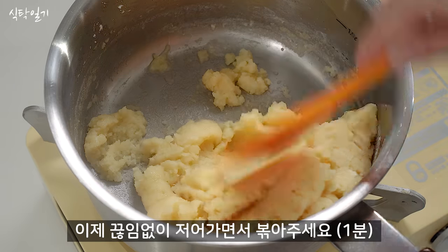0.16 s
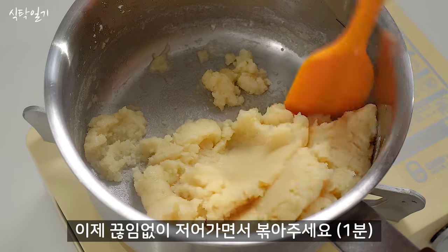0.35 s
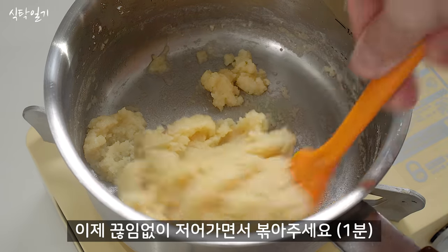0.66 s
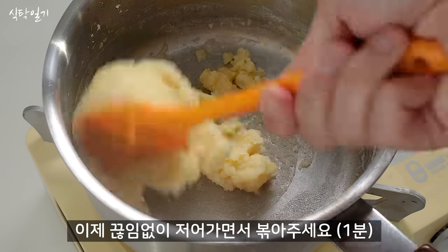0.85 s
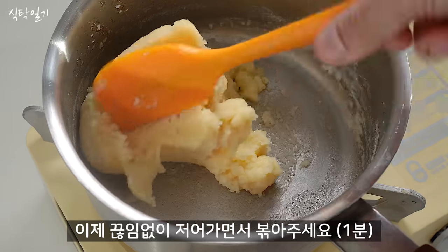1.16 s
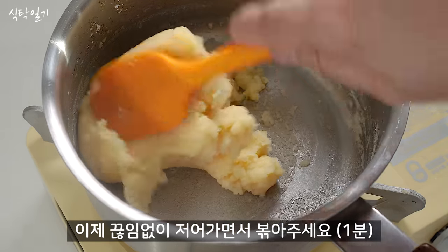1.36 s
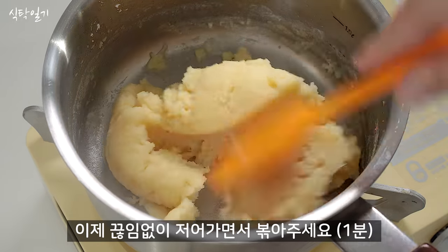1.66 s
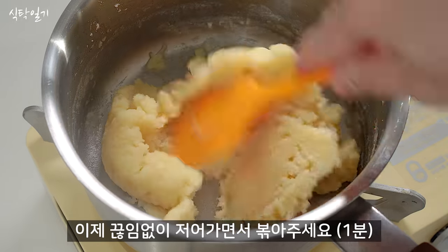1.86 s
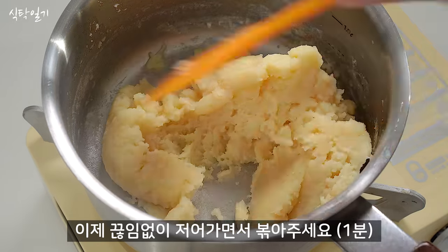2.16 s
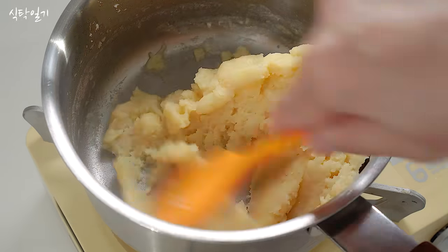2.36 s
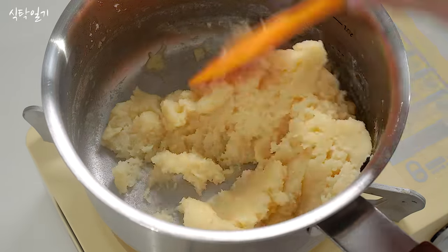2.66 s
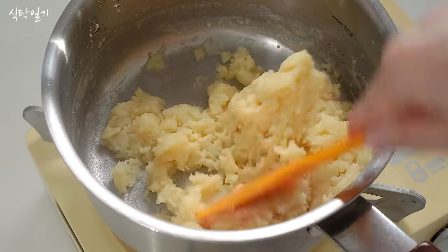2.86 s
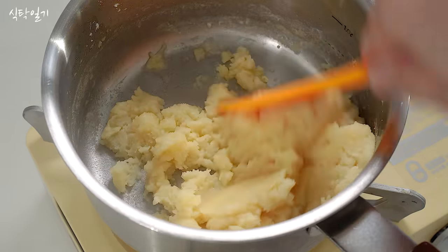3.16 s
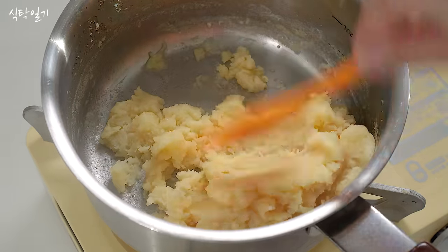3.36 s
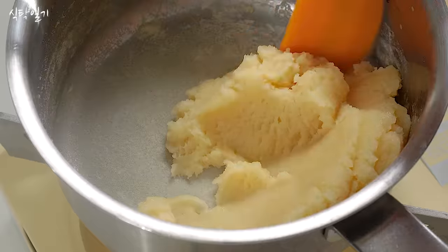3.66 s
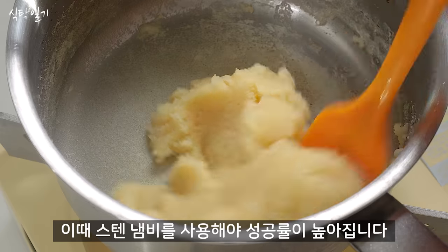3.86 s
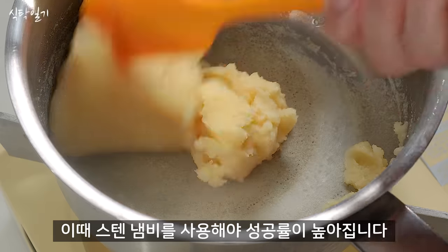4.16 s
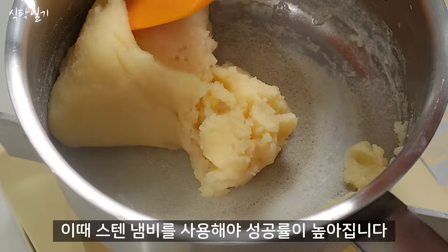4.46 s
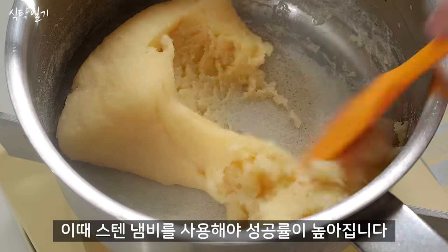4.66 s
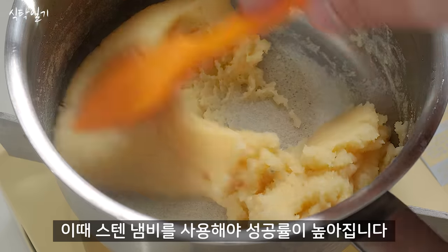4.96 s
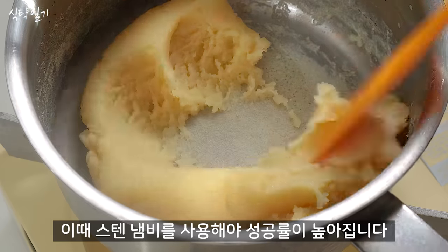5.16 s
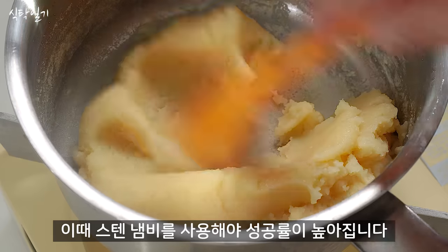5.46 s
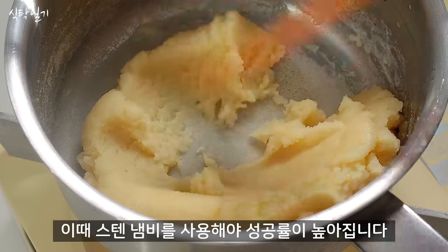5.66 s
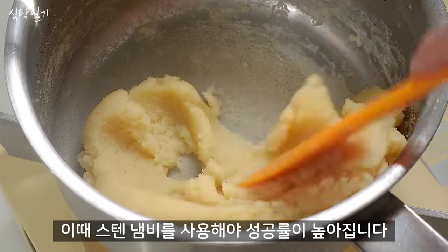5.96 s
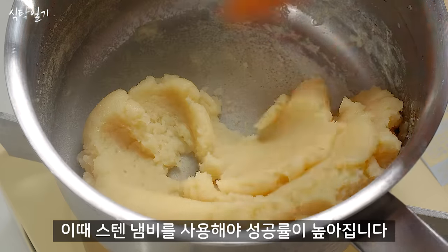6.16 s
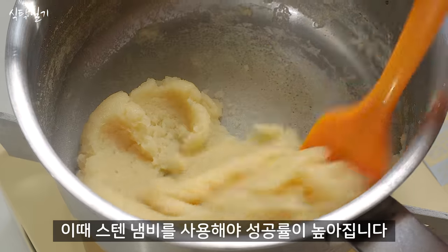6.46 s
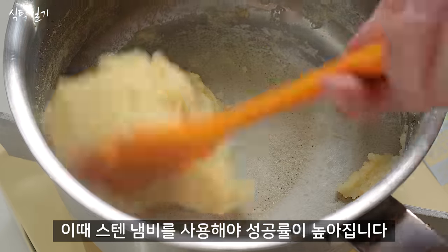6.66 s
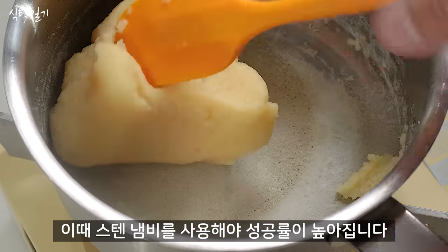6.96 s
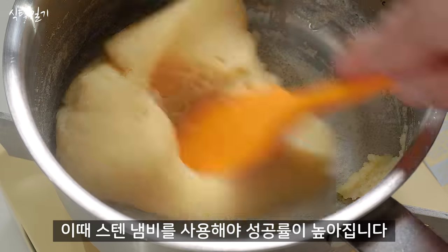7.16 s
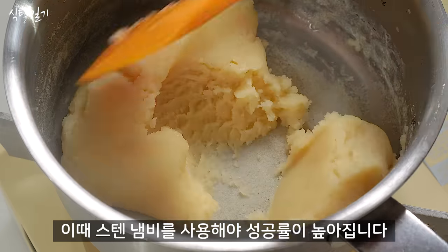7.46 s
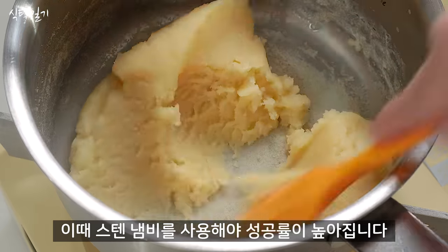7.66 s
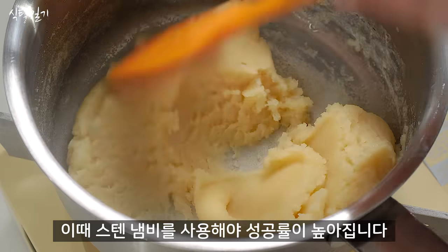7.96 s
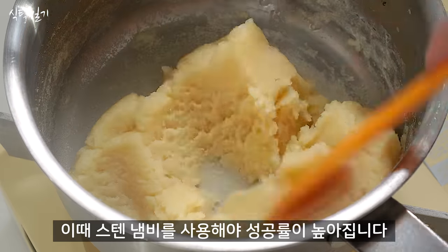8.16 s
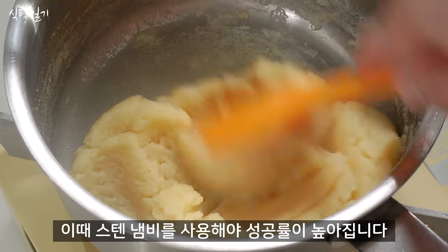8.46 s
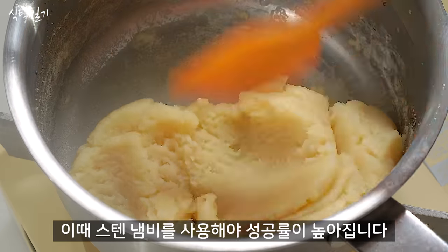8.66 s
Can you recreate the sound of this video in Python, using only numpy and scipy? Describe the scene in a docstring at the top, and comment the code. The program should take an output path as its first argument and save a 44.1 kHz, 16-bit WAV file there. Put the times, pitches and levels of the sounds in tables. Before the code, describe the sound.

Wet dough sizzles steadily in a hot steel pan while a spatula smears and scrapes it, with sharp steam pops and a few dull hollow thuds.

```python
"""A silicone spatula folds and presses buttery dough in a hot steel saucepan, close to a stereo microphone.
Its stick-slip clicks stir the hollow ring of the pan, and sticky clumps of clicks smear the dough over the steel.
Water boils out in a steady sizzle of dense tiny bursts; bubbles, and one spatula tap, pop as ragged, echoing snaps.
Hard shoves thud as struck pan ring; judder and bumps, filtered low, rumble as the pan shifts on the stove."""
import sys
import numpy as np
from scipy import signal
from scipy.fft import rfft, irfft, next_fast_len
from scipy.io import wavfile

SR = 44100
rng = np.random.default_rng(int(sys.argv[2]) if len(sys.argv) > 2 else 0)


def master_out(mix):
    """Clip the mix to full scale and print it as 16-bit PCM to the path in sys.argv[1]."""
    frames = np.transpose(np.atleast_2d(mix))
    ceiling = np.clip(frames, -1, 1)
    pcm = np.round(ceiling * 32767).astype(np.int16)
    wavfile.write(sys.argv[1], SR, pcm)


N = 388080

# loudest snaps, mostly single bubbles bursting, with a spatula tap at 6.154 s:
# (time [s], relative strength [dB], brightness [dB/octave])
LOUD_SNAPS = [(0.026, -13, 4), (0.4077, -10, 3), (0.8236, -11, 5), (0.9341, -9.5, 3), (1.2139, -3.5, -0.5),
              (1.3745, -13, 5), (1.5717, -10, 3), (1.61, -7, 4), (1.758, -9, 1), (1.8383, -11, -2.5),
              (1.862, -5.5, 4), (1.9411, -11, 10), (2.4096, -11, 9), (2.461, -10, -0.5), (2.885, -9, 14),
              (3.0959, -9.5, 5), (3.1452, -14.5, -12), (3.4585, -1.5, -0.5), (4.742, -5.5, -0.5),
              (5.3386, -7, 2), (5.3514, -12, 12), (5.3736, -7, 11), (5.4773, -11, 4), (5.8109, -2, -2.5),
              (6.154, -9.5, -5), (6.2489, -7, -1), (6.4825, -7.5, 4), (6.923, -2, -2), (7.2824, -12, 13),
              (7.8066, -6, 1.5), (8.0845, -3, -10)]
# shoves and taps of the spatula:
# (time [s], blow peak [dB], rubbing ring [dB], wet scuff [dB], rise [s], fall [s])
SPATULA_SHOVES = [(3.578, -25.5, -34, -51, 0.011, 0.035), (3.896, -33, -27, -38, 0.025, 0.0066),
                  (4.012, -37, -50, -44, 0.065, 0.011), (5.374, -47, -53, -40, 0.002, 0.005),
                  (5.811, -50, -48, -53, 0.00099, 0.018), (6.154, -32, -42, -44, 0.0011, 0.015),
                  (6.450, -19.5, -26.5, -41, 0.026, 0.015), (6.492, -40, -34.5, -41, 0.0095, 0.05),
                  (6.923, -45, -56, -40, 0.00057, 0.0036), (6.953, -52, -41, -35, 0.002, 0.015),
                  (7.697, -33, -37.5, -49, .005, 0.026), (8.116, -17.5, -29, -44, 0.0095, 0.023)]
# strokes of the spatula, each dragging on the pan, smearing dough and pressing out steam:
# (time of fastest motion [s], drag [dB], smear [dB], steam before its feed gains [dB], rise [s], fall [s])
SPATULA_STROKES = [(0.01, -43.5, -47.5, -39.5, 0.025, 0.11), (0.56, -64.0, -54, -40.5, 0.012, 0.082),
                   (0.77, -46.0, -49, -45.5, 0.28, 0.106), (0.97, -48.5, -53.5, -64, 0.16, 0.23),
                   (1.38, -50, -46.5, -47, 0.012, 0.011), (1.55, -49.5, -45, -43, 0.15, 0.13),
                   (1.86, -58.5, -50.5, -48, 0.23, 0.35), (1.97, -50, -51, -40.0, 0.041, 0.052),
                   (2.25, -64.0, -56, -46.0, 0.012, 0.12), (2.39, -57, -60, -42.5, 0.075, 0.26),
                   (2.8, -63, -53.5, -42, 0.14, 0.1), (3.15, -61, -59.0, -45, 0.065, 0.13),
                   (3.25, -54.5, -67, -50, 0.012, 0.072), (3.71, -63, -55.0, -47.5, 0.13, 0.037),
                   (3.95, -39.5, -46, -44.5, 0.26, 0.081), (4.13, -52.0, -54, -58, 0.3, 0.41),
                   (4.63, -56.5, -48, -53, 0.12, 0.031), (4.66, -64.0, -57.5, -44.5, 0.013, 0.14),
                   (4.94, -72, -56, -46.0, 0.124, 0.024), (5.04, -52.5, -52.5, -43, 0.055, 0.078),
                   (5.51, -52.5, -53.5, -44, 0.055, 0.095), (5.62, -54.5, -61, -49, 0.021, 0.085),
                   (5.9, -47, -53.5, -47, 0.077, 0.12), (6.31, -46.5, -52, -45, 0.15, 0.013),
                   (6.45, -41, -48, -44.5, 0.14, 0.3), (6.95, -53.5, -52, -62, 0.053, 0.25),
                   (7.24, -59.5, -52.5, -42.5, 0.13, 0.1), (7.6, -56.5, -53.5, -46, 0.037, 0.51),
                   (7.83, -60, -64, -55, 0.14, 0.015), (8.09, -68, -48.5, -42.0, 0.1, 0.017),
                   (8.21, -47, -54.5, -56, 0.2, 0.097), (8.51, -61, -55.5, -44.0, 0.25, 0.034),
                   (8.56, -50, -61.0, -56.0, 0.18, 0.13)]
# pushes hard enough to slide the pan on the stove: (time [s], judder [dB], rise [s], fall [s])
PAN_SLIDES = [(.40, -51.5, 0.028, 0.1), (.82, -58, 0.034, 0.047), (1.21, -70, .02, 0.044),
              (3.65, -51.5, 0.025, .11), (3.91, -55.5, .08, 0.056), (6.19, -58, .014, 0.085),
              (6.35, -48, 0.043, 0.12), (6.99, -66.5, .015, .08), (7.23, -75, .025, 0.062),
              (7.72, -54.5, 0.035, .05), (8.13, -47, 0.018, 0.085), (8.58, -66, 0.025, .035)]
# the pan bumping on its support: (time [s], peak [dB])
PAN_BUMPS = [(.364, -41.5), (.385, -40.5), (.424, -42), (.437, -50), (3.640, -47), (8.112, -34),
             (8.130, -33)]
# steady boiling under resting dough, stronger as more of it lies on hot steel: (time [s], fizz level [dB])
BOIL_LEVEL = [(0.0, -39), (0.3, -38), (0.7, -37), (1.3, -39.0), (1.6, -36), (2.2, -36.5), (2.5, -37.5),
              (3.3, -37), (3.9, -36.5), (4.3, -37.5), (4.9, -36), (5.45, -34), (6.35, -34), (6.75, -38.5),
              (7.1, -38), (7.7, -36.0), (8.35, -36), (8.8, -37.0)]

# colour of the boiling: (frequency [Hz], relative level [dB])
BOIL_COLOUR = [(380, -48), (500, -40.5), (595, -30), (680, -42), (900, -24.5), (1800, -15.5), (2400, -7.5),
               (3400, -1.5), (4300, -3), (5300, -5.5), (6200, -2.5), (7200, -.5), (8200, 0.5), (10800, -3),
               (13200, -1), (15800, -3)]
# colour of dough tearing off steel: (frequency [Hz], relative level [dB])
DOUGH_COLOUR = [(120, -54), (330, -30), (520, -10.5), (800, -1), (1100, 1.5), (1420, 0), (1850, 1.5),
                (3000, 1), (5000, -10.5), (8000, -0.5), (16000, -10.5)]
# colour of the rubbed or struck pan: (frequency [Hz], relative level [dB])
RING_COLOUR = [(100, -76.5), (235, -22), (330, -41.5), (420, -23), (495, -4.5), (590, -1.5), (700, 0),
               (850, -5.5), (1100, -20), (1410, -20), (1800, -49), (4000, -24.5)]
# colour of the pan moving on the stove: (frequency [Hz], relative level [dB])
RUMBLE_COLOUR = [(20, -11), (45, -9), (80, -3), (102, -10), (148, 0.5), (195, -4.5), (245, -4.5),
                 (275, -23), (310, -28.5), (500, -14), (1200, -58)]
# colour of the snaps: (frequency [Hz], relative level [dB])
SNAP_COLOUR = [(250, -59), (600, -9), (1500, -11), (2600, 0.5), (4000, 2.5), (5500, -0.5), (8000, 6.5),
               (11000, 0.5), (16000, -5)]
# resonances (+) and hollows (-) of the pan, heard in all sources coloured by it:
# (frequency [Hz], width [Hz], gain [dB])
PAN_RESONANCES = [(251, 96, 9), (367, 23, -10), (460, 22, -7.5), (499, 49, 3.5), (591, 36, 6),
                  (745, 96, -5.5), (1050, 43, -3), (1500, 370, 6), (2264, 265, 3.5)]
# between the microphone ports:
# (frequency [Hz], left-right likeness [0-1], left minus right [dB], left's lead [rad])
STEREO_PORTS = [(60, 0.04, 0, 0.1), (150, 0.12, -9, 0), (261, 0.17, -4.5, 0.26), (427, 0.58, 10, 0),
                (555, 0.96, -5, 0.08), (750, 0.8, -7, 0.28), (1500, 0.68, -2.5, 0.076),
                (2490, 0.91, -0.5, 0.048), (4080, 0.82, -2.5, 0.36), (5100, 0.68, -5.5, 1.34),
                (5900, 0.62, 1.5, 1.42), (7450, 0.85, 1.8, 0.85), (10000, 0.74, 0.8, 1.04),
                (15000, 0.65, -0.5, 0.95)]

EDGE_HZ = 15950  # upper edge of the sound
TIME = np.arange(N) / SR
SIZE = next_fast_len(N + 8192, True)  # transform length, with room for ringing tails
HZ = np.fft.rfftfreq(SIZE, 1 / SR)

STEAM_FIZZ_DB, STEAM_COARSE_DB = 4.5, 7.5  # how strongly pressed-out steam feeds fine and coarse bubbling
REST_COARSE_DB = -2.5  # coarse bubbling under resting dough, relative to the fizz
SETTLING_DB = -62.5  # the dough keeps sagging and tearing a little between strokes
STROKE_SHAPE = 1.39  # exponent of a stroke's swell: 1 is a sharp peak, 2 a rounded bell
SMALL_POPS_DB, SMALL_POPS_SPREAD_DB = -17.5, 3  # middle relative strength, and the reach either side
SMALL_POPS_BRIGHTNESS = 1.7  # average, dB per octave


def amp(db):
    """Decibels to gain."""
    return 10 ** (np.asarray(db) / 20)


def read(points, column=1):
    """A table over frequency, joined on a log axis."""
    table = np.transpose(points)
    return np.interp(np.log(HZ + 1), np.log(table[0] + 1), table[column])


def curve(rows, column=1):
    """A table over time, joined by straight lines."""
    table = np.transpose(rows)
    return np.interp(TIME, table[0], table[column])


def wave(spectrum):
    """Back from frequency to time."""
    return irfft(spectrum, SIZE)[..., :N]


def causal(db):
    """The minimum-phase response with these gains: it rings only after it is struck."""
    cepstrum = irfft(np.log(amp(db)), SIZE)
    # fold the backward half onto the forward half
    cepstrum[1:SIZE // 2] *= 2
    cepstrum[SIZE // 2 + 1:] = 0
    return np.exp(rfft(cepstrum))


def placing():
    """Level and phase of the pan's sound at the left and right port."""
    half = amp(read(STEREO_PORTS, 2) / 2) * np.exp(.5j * read(STEREO_PORTS, 3))
    return np.array([half, 1 / half])


def response(colour):
    """A source's colour, through the pan's resonances, at the left and right port."""
    modes = sum(db / (1 + (2 * (HZ - hz) / width) ** 2) for hz, width, db in PAN_RESONANCES)
    return causal(read(colour) + modes) * placing()


def flutter(hz, depth_db):
    """A gain that wanders at random, its motion fading out above hz."""
    slow = wave(rfft(rng.standard_normal(SIZE)) / np.sqrt(1 + (HZ / hz) ** 4))
    return amp(depth_db * slow / slow.std())


def grains(per_s, spread_db, limit):
    """Clicks at random moments, mostly small, a few large; three rows with unrelated signs."""
    size = amp(spread_db * np.minimum(rng.exponential(1, N), limit))
    struck = rng.random(N) < per_s / SR
    clicks = size * struck * rng.choice([-1., 1.], (3, N))
    # a burst opens and closes within a fraction of a millisecond: the gap gives each its own colour
    closing = (np.arange(N) + rng.integers(1, 9, N)) % N
    return np.array([row - np.bincount(closing, row, N) * rng.choice([-1., 1.], N) for row in clicks])


def ports(clicks, colour, band):
    """Clicks from all over the pan reach both ports, partly alike; mid rms 1 within the band [Hz]."""
    shared, left, right = rfft(clicks, SIZE)
    same = np.clip(read(STEREO_PORTS), 0, 1)
    mixed = np.sqrt(same) * shared + np.sqrt(1 - same) * np.array([left, right])
    pair = mixed * response(colour)
    inside = (HZ > band[0]) & (HZ < band[1])
    power = 2 * np.sum(abs(pair.mean(0)[inside]) ** 2) / SIZE / N
    return pair / np.sqrt(power)


def swells(rows, column, shape=1):
    """Each push builds to its peak and dies away; overlapping ones add in power. Rows end in rise, fall [s]."""
    power = np.zeros(N)
    for row in rows:
        t = TIME - row[0]
        rise, fall = row[-2:]
        away = np.maximum(-t / rise, t / fall)
        near = away < 10
        power[near] += (amp(row[column]) * np.exp(-away[near] ** shape)) ** 2
    return np.sqrt(power)


def strokes(column):
    """Drag, smear or steam of all the spatula's strokes."""
    return swells(SPATULA_STROKES, column, STROKE_SHAPE)


def blows(rows, colour, soft_hz=1800):
    """Pushes cushioned by dough, each ringing with this colour; rows start (time [s], mid peak [dB])."""
    force = np.zeros(SIZE)
    for s, db, *_ in rows:
        force[round(s * SR)] += amp(db)
    ring = response(colour) / (1 + (HZ / soft_hz) ** 4)
    return wave(rfft(force) * ring) / abs(wave(ring).mean(0)).max()


def singing(hz=595, width_hz=34, db=-28):
    """A strong pan resonance sounds faintly under the sizzle: noise in a narrow filter, following the boil."""
    resonance = 1 / (1 + 2j * (HZ - hz) / width_hz) ** 2
    ring = wave(rfft(rng.standard_normal(SIZE)) * placing() * resonance)
    return ring / ring.mean(0).std() * amp(curve(BOIL_LEVEL) + db)


def stove():
    """Pushed sideways, the pan judders and bumps on its support."""
    judder = grains(per_s=700, spread_db=0.2, limit=6.0)
    sliding = wave(ports(judder, RUMBLE_COLOUR, band=(30, 190))) * swells(PAN_SLIDES, column=1)
    return sliding + blows(PAN_BUMPS, RUMBLE_COLOUR)


def small_pops(count=14):
    """Faint bubbles at random moments: (time [s], relative strength [dB], brightness [dB/octave])."""
    rows = []
    for when, size, bright in rng.random((count, 3)):
        strength_db = SMALL_POPS_DB + SMALL_POPS_SPREAD_DB * (2 * size - 1)
        rows.append((when * N / SR, strength_db, SMALL_POPS_BRIGHTNESS * 2 * bright))
    return rows


def snaps(crack_db=-7, crack_s=0.00068, wall_db=-7, wall_s=0.0027, room_db=-12, room_s=0.018, pivot_hz=6000):
    """Each bubble burst or tap is one ragged snap, thrown about by the pan's walls and then by the kitchen."""
    size = 4096
    lead = size // 64  # samples ahead of the snap, since the tilt spreads it both ways
    t, hz = np.arange(size) / SR, np.fft.rfftfreq(size, 1 / SR)
    out = np.zeros((2, N + size))
    for s, db, brightness in LOUD_SNAPS + small_pops(count=14):
        paths = np.zeros((2, size))
        paths[:, 0] = 1  # the direct click
        for echo_db, decay_s in ((crack_db, crack_s), (wall_db, wall_s), (room_db, room_s)):
            envelope = np.exp(-t / decay_s) * (1 - np.exp(-t / 0.00021))
            echo = rng.standard_normal((2, size)) * envelope
            paths += amp(echo_db) * echo / np.linalg.norm(echo[0])
        tilt = amp(brightness * np.log2(np.clip(hz, 1200, 12000) / pivot_hz))
        tilt /= np.sqrt(np.mean(tilt[hz < EDGE_HZ] ** 2))  # brightness leaves the overall strength alone
        snap = irfft(rfft(np.roll(paths, lead, axis=1)) * tilt)
        start = max(round(s * SR) - lead, 0)
        out[:, start:start + size] += amp(db) * snap
    return amp(2.0) * wave(rfft(out, SIZE) * response(SNAP_COLOUR))


def sizzle():
    """Thousands of tiny steam bursts a second; strokes press wet dough on steel and coarser ones flare up."""
    bursts = grains(per_s=18000, spread_db=2.0, limit=6.3)
    bursts = bursts * flutter(hz=44.8, depth_db=0.16) * flutter(hz=7.6, depth_db=0.3)
    steam = ports(bursts, BOIL_COLOUR, band=(6000, 16000))
    coarse = 1 / (1 + (HZ / 5400) ** 6)  # share of each frequency that is coarse bubbling
    resting, pressed = amp(curve(BOIL_LEVEL)), strokes(column=3)
    fizz = np.hypot(resting, pressed * amp(STEAM_FIZZ_DB))
    bubbling = np.hypot(resting * amp(REST_COARSE_DB), pressed * amp(STEAM_COARSE_DB))
    bubbling = bubbling * flutter(hz=17, depth_db=1.0)
    return fizz * wave(steam * (1 - coarse)) + bubbling * wave(steam * coarse)


def smear():
    """Wet dough tears loose from the steel in small sticky clumps."""
    tears = grains(per_s=5000, spread_db=0.5, limit=4.1) * flutter(hz=35, depth_db=2.0)
    scuffs = swells(SPATULA_SHOVES, column=3)
    level = np.sqrt(amp(SETTLING_DB) ** 2 + strokes(column=2) ** 2 + scuffs ** 2)
    return wave(ports(tears, DOUGH_COLOUR, band=(1000, 2000))) * level


def pan():
    """The spatula blade sticks and slips; the pan, damped by dough, answers with a short hollow ring."""
    slips = grains(per_s=3000, spread_db=3.0, limit=2.26) * flutter(hz=24.6, depth_db=1.16)
    level = np.hypot(strokes(column=1), swells(SPATULA_SHOVES, column=2))
    rubbing = wave(ports(slips, RING_COLOUR, band=(430, 900))) * level
    return rubbing + blows(SPATULA_SHOVES, RING_COLOUR)


def scene():
    """Everything sounds from the one pan."""
    return singing() + stove() + snaps() + sizzle() + smear() + pan()


def record(dry):
    """The recorder's band limit: a steep low-pass at the upper edge."""
    lowpass = signal.firwin(601, EDGE_HZ, window=("kaiser", 9), fs=SR)
    return signal.oaconvolve(dry, lowpass[None], "same")


dry = scene()
out = record(dry)
master_out(out)
```